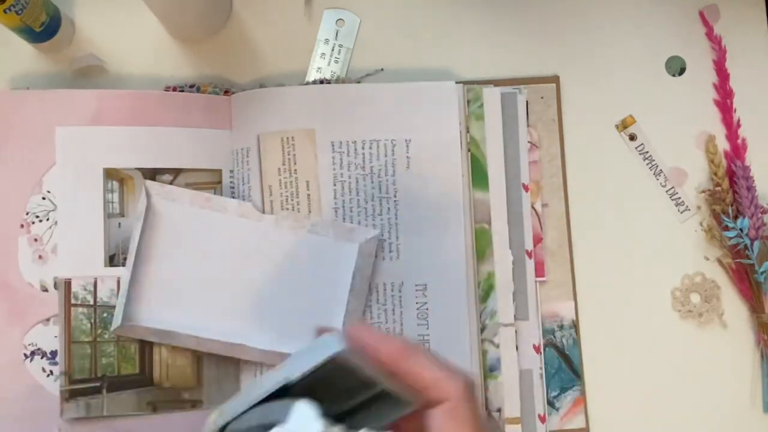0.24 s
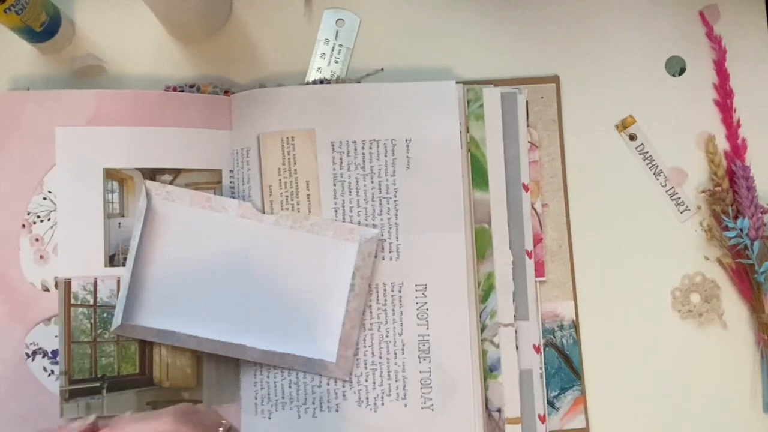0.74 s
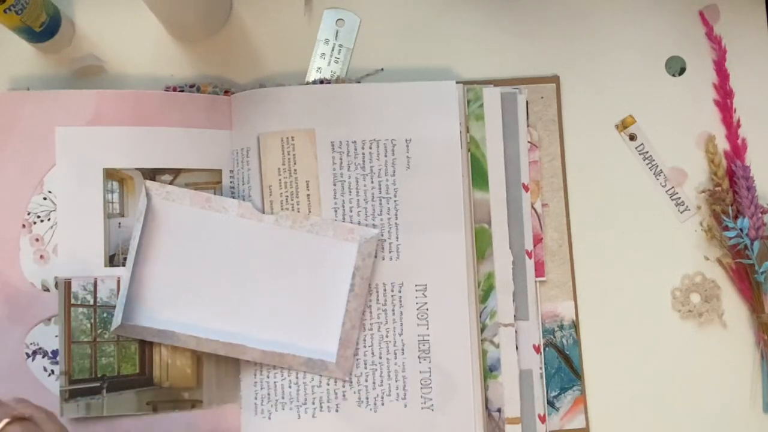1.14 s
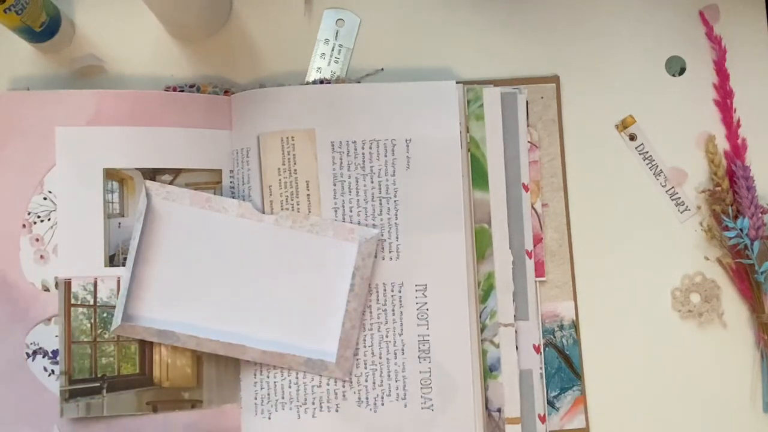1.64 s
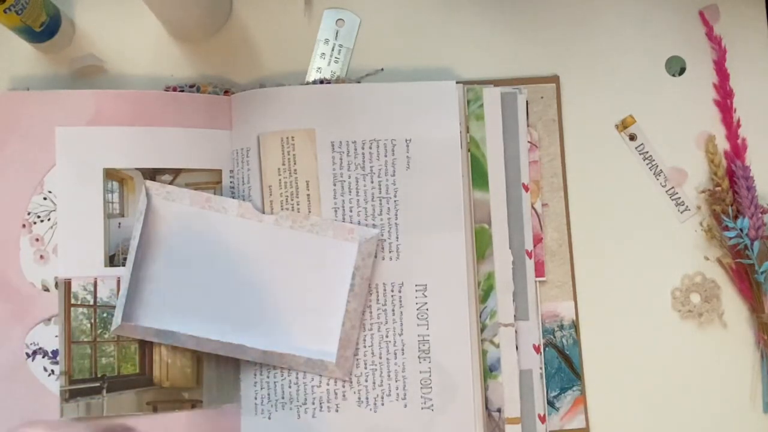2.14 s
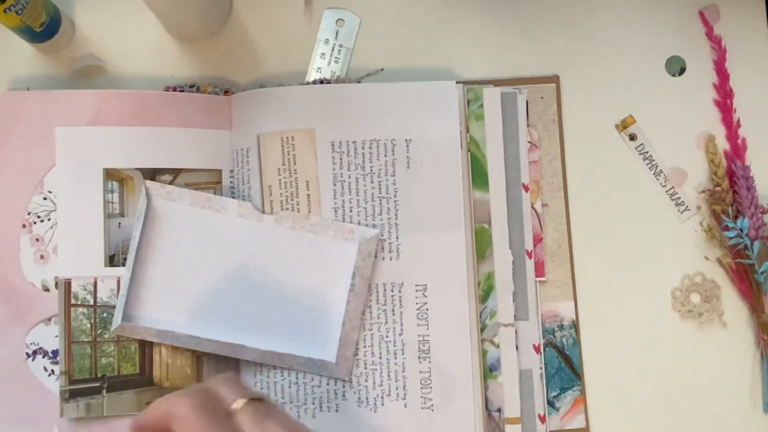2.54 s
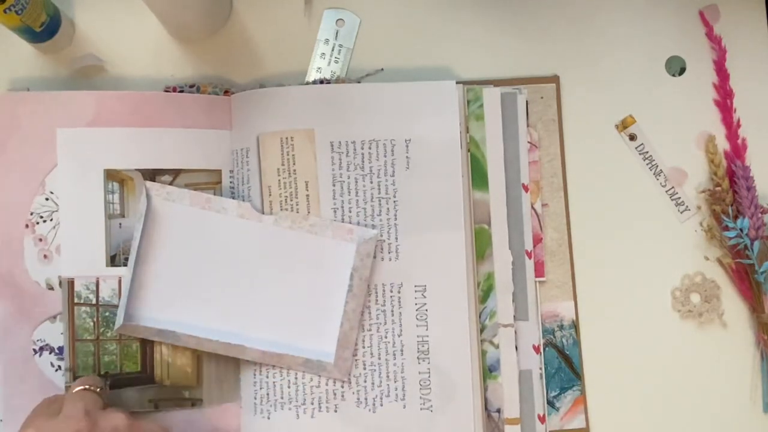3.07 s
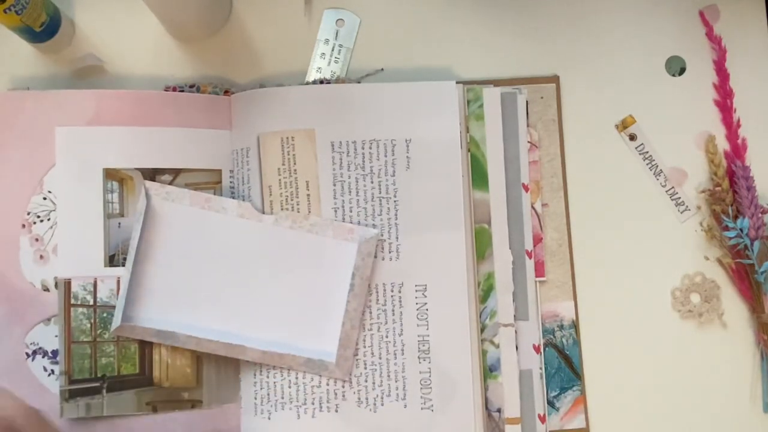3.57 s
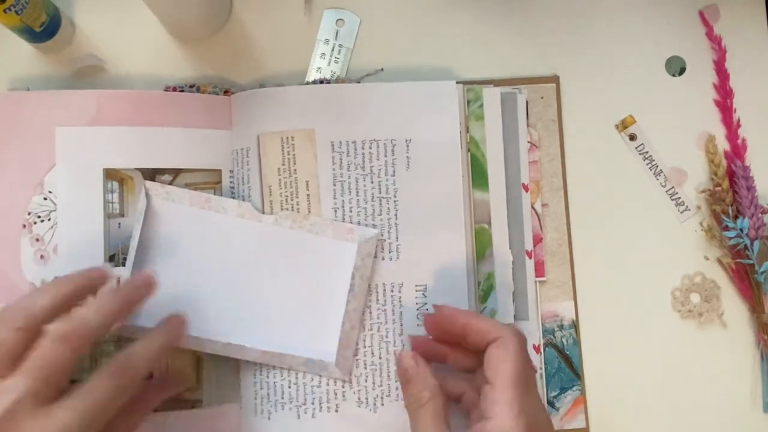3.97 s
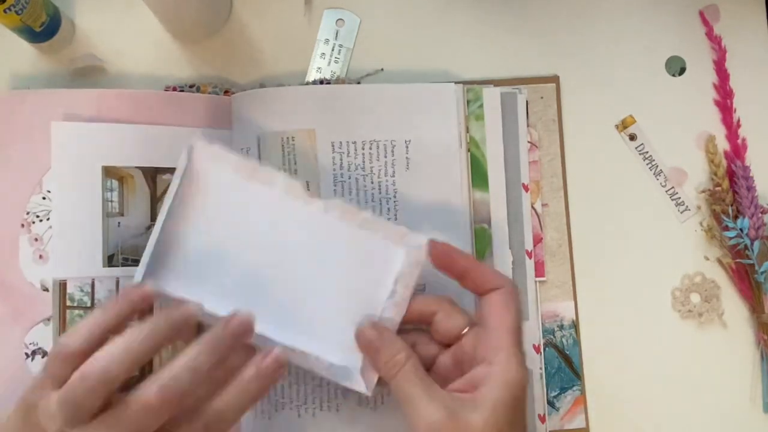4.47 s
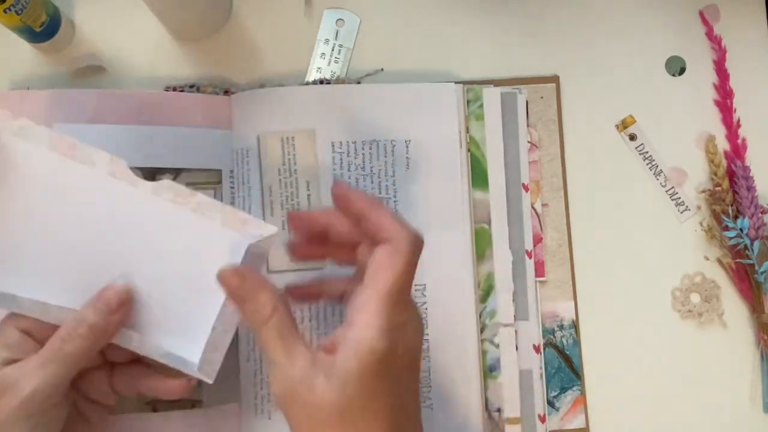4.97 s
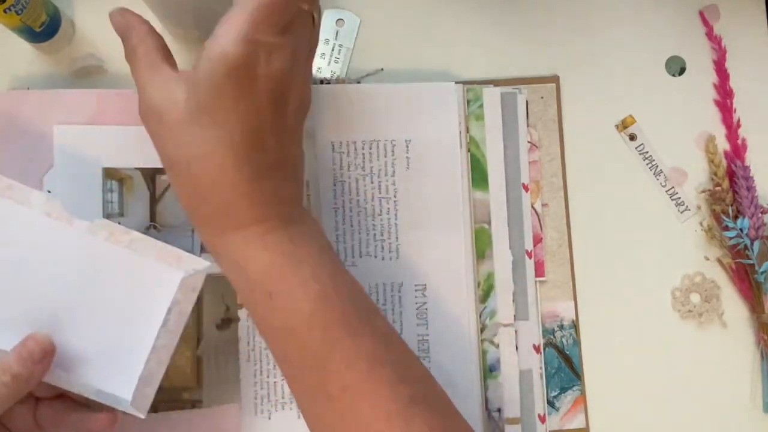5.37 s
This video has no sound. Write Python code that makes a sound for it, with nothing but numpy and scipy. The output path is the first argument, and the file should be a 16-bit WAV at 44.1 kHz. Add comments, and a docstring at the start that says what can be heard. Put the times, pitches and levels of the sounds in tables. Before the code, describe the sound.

Close stereo pickup at a craft table in a quiet small room. Brief finger rubs and paper ticks, then paper scrapes into a hand punch, a dry click as it seats, and a loud crunchy snap. A pause, the punch is put down with soft thumps, and fingers brush and flick folded paper. A low, wavering engine hum continues far off.

```python
"""Punching paper at a craft table

A hand punch close to a stereo microphone bites a notch out of folded paper: noise excites gliding slot
resonances as the paper slides in, and damped modes ring as the die seats, snaps through and is put down.
Fingers brush and lift a journal page: friction noise rubs, and short filtered bursts tick and knock.
An engine hums far off as a sum of harmonic orders over a band of rumble, amid faint room noise."""
import sys
import numpy as np
from scipy import signal
from scipy.fft import rfft, irfft, next_fast_len
from scipy.io import wavfile
from scipy.ndimage import uniform_filter1d

SR = 44100
rng = np.random.default_rng(int(sys.argv[2]) if len(sys.argv) > 2 else 0)


def master(y):
    """Save y as 16-bit WAV."""
    cut = np.clip(np.atleast_2d(y).T, -1, 1)
    pcm = np.round(cut * 32767)  # scale
    wavfile.write(sys.argv[1], SR, pcm.astype(np.int16))


N = 247401
TIME = np.arange(N) / SR

# All levels below are relative: the mix applies further gains.

# Steel die meeting the paper, then breaking through: (frequency [Hz], width [Hz], level [dB])
SEAT_MODES = [(480, 330, -14.5), (1393, 185, -2.5), (1316, 127, -8), (1780, 180, -5), (2520, 130, 1.5),
              (4020, 110, -21), (5200, 320, -9), (7400, 830, -31), (8860, 720, -24), (10100, 650, -47)]
SNAP_MODES = [(740.4, 170, -27), (1910, 210, -18), (2290, 390, -6), (3780, 290, -11.5), (4670, 210, -8),
              (5030, 320, -0.5), (5670, 230, -6.5), (6145, 220, -9), (8110, 150, -13.5), (8830, 120, -17.5),
              (10070, 190, -26), (10800, 510, -29.5), (15900, 500, -22.5)]
# Tearing fibres: (frequency [Hz], level [dB])
CRACK_COLOUR = [(300, -3), (1000, -14), (2400, 4.5), (3000, -4.5), (4000, 2), (5400, 1), (7000, 0),
                (8700, -2), (13500, -3), (15600, -24.5)]
# Cut edges scraping past the die: (frequency [Hz], level [dB])
CRUNCH_COLOUR = [(300, -7.5), (1000, -5), (1900, -7), (2500, 0), (3100, -5), (3900, 0), (4500, -3),
                 (5600, -2.5), (7000, -14.5), (9000, -4.5), (11500, -14.5), (15600, -23.5)]
# Steel of the punch ringing on, lower when squeezed shut than when let go:
# (time [s], level [dB], pitch [Hz])
STEEL_RINGS = [(1.155, -47.5, 2417), (1.766, -71, 2670)]
# Modes of that steel: (ratio to the pitch [-], level [dB], t60 [s])
STEEL_MODES = [(1, 0, .15), (1.03, -3, .12), (1.96, -4, .13)]
# Punch body ringing on the table: (frequency [Hz], level [dB], t60 [s])
BODY_MODES = [(391, 6.5, 0.067), (845, 0.5, 0.067), (1214, -13, 0.46), (1525, -13, 0.41), (1610, -12, .12),
              (1890, -1.5, 0.14), (1990, -5, 0.24), (2030, -4, 0.29), (2133, 0, 0.15), (2470, -11, 0.13),
              (4070, -4, 0.035), (4940, -3, 0.04), (5000, -12, .1)]

# Paper sliding in the slot of the punch: (start [s], hold [s], release [s], level [dB],
# first hollow resonance [Hz], last [Hz], width of each filter pass [Hz], steel resonance [Hz], its level [dB])
SLIDES = [(0.38, 0.08, 0.065, -59, 1950, 1820, 950, 2720, -7),
          (0.495, 0.12, 0.022, -68.5, 1600, 1370, 450, 2740, -12),
          (.68, 0.16, .06, -77, 1450, 1620, 450, 2520, -10),
          (.875, 0.12, 0.081, -81, 1540, 1837, 560, 2540, -14)]
# Rasp of fibres along the slot: (frequency [Hz], level [dB])
SLOT_COLOUR = [(400, -9), (900, -6.5), (1150, -8), (1500, 2.5), (2000, -8.5), (2700, -5.5), (3300, -2.5),
               (4400, 1), (5600, 6), (7000, -3.5), (8700, 0.5), (13500, -5.5), (16000, -30.5)]
SLIDE_ATTACK_S, SLIDE_SWELL_DB = 0.022, 2.5  # a slide takes hold, then gains this much over its hold
SLOT_WIDTH_HZ = 260  # width of each filter pass for the steel slot
SLIDE_RASP_DB = -5  # broad rasp beside the resonances

# Fingers and paper rubbing: (start [s], push [s], release [s], pressing drag [dB],
# centre of the drag [Hz], light sliding hiss [dB])
STROKES = [(.004, 0.0027, 0.046, -95, 880, -69), (0.087, 0.0068, 0.027, -49, 895, -51.5),
           (0.156, 0.0038, 0.029, -53.5, 1020, -64), (1.24, 0.023, 0.77, -73, 2500, -85.5),
           (1.412, 0.082, 0.018, -78, 1140, -71), (2.714, 0.006, 0.15, -64, 1305, -69.5),
           (2.86, 0.052, 0.024, -45.5, 900, -61.5), (2.946, 0.045, 0.059, -54, 824, -63),
           (3.059, 0.066, 0.018, -101, 1000, -71.5), (3.28, 0.015, 0.15, -70, 2520, -74),
           (3.375, 0.035, 0.0093, -87, 2420, -76), (3.47, 0.092, 0.2, -66.5, 1950, -77.5),
           (3.76, 0.16, 0.069, -67.5, 1407, -115), (4.009, 0.048, 0.016, -48, 887, -64),
           (4.05, 0.075, 0.04, -61, 1320, -64.5), (4.141, 0.077, 0.03, -73, 1440, -64),
           (4.225, 0.077, 0.045, -66, 1380, -60.5), (4.37, 0.085, 0.043, -61, 1160, -62),
           (4.329, 0.03, 0.038, -57, 624, -57), (4.415, 0.0093, 0.037, -49.5, 780, -78),
           (4.419, 0.014, 0.02, -52.5, 1220, -83), (4.475, 0.013, 0.0038, -58, 1130, -90),
           (4.565, 0.045, 0.72, -69, 894, -75.5), (4.729, 0.0031, 0.066, -82, 1010, -72.5),
           (4.774, 0.11, 0.015, -68, 626, -59), (4.901, 0.19, 0.78, -79.5, 706, -74),
           (5.381, 1, 0.009, -101, 864, -65.5)]
# The pressed page: (ratio to the centre of the drag [-], width of each filter pass [Hz], level [dB])
PAGE_MODES = [(1, 170, 4), (1.55, 250, 0), (2.4, 385, -4.5)]
# Pressed and lightly touched paper: (frequency [Hz], level [dB])
DRAG_COLOUR = [(100, -29), (300, 8.5), (520, -1), (850, -0.5), (1150, -3), (1500, 1), (2000, -6),
               (2500, -0.5), (3400, -11), (6000, -6), (16000, -39)]
HISS_COLOUR = [(300, -28), (1400, -13.5), (2000, -6), (2600, -4), (3400, -11), (4400, -8), (5600, -0.5),
               (7000, -5.5), (8700, -1.5), (11000, -6), (13500, -6), (15600, -13.5)]
ATTACK_SHARE, SWELL_DB = 0.14, 7  # share of the push in which a stroke takes hold; its gain until let go
PAGE_DRIFT_OCTAVES, PAGE_DB = 0.08, -4  # the page resonances drift as the finger moves
# Random bright patches in the sliding hiss: depth, width and life
HISS_PATCH_DB, HISS_PATCH_HZ, HISS_PATCH_S = 3.2, 700, .045

# Paper ticks and flicks: (time [s], level [dB], colour centre [Hz], decay [s])
TICKS = [(.0803, -49, 4260, 0.0045), (.093, -51, 2480, 0.027), (.107, -49.5, 1070, 0.0065),
         (.1596, -34, 2500, 0.00095), (.179, -36, 3360, 0.00078), (.2248, -41, 3640, 0.00094),
         (.2318, -42.5, 4030, 0.00082), (.773, -54, 1500, 0.0014), (.868, -63.5, 2550, 0.0054),
         (1.145, -49.5, 3360, .003), (1.446, -53.5, 5650, 0.0014), (1.455, -53.5, 1092, 0.003),
         (1.7652, -63.5, 4900, 0.024), (2.144, -71.5, 5170, 0.032), (2.498, -70.5, 2190, 0.012),
         (2.7155, -57.5, 5670, 0.0071), (2.784, -66.5, 7900, 0.005), (2.875, -54, 4500, 0.011),
         (3.406, -44.5, 10000, 0.0061), (3.42, -42, 8200, 0.0028), (3.425, -36.5, 11100, 0.0047),
         (3.4262, -55, 4370, 0.0022), (3.4489, -23.5, 12000, 0.0007), (3.4493, -37.5, 4210, 0.0018),
         (4.003, -54.5, 3610, 0.0019), (4.0085, -51.5, 1746, 0.0048), (4.025, -53, 1470, 0.014),
         (4.16, -57.5, 2320, 0.0023), (4.184, -51, 2600, 0.0016), (4.249, -63, 2430, 0.0011),
         (4.268, -57, 2800, 0.0022), (4.297, -56, 3240, .003), (4.333, -51.5, 5200, 0.0022),
         (4.349, -51, 3400, 0.0025), (4.361, -49, 3540, 0.0024), (4.616, -51.5, 2030, 0.012),
         (4.621, -44, 5000, 0.0056)]
# Soft knocks on the table and journal: (time [s], level [dB], colour centre [Hz], decay [s])
KNOCKS = [(2.149, -53, 480, 0.021), (2.260, -51.5, 794, 0.024), (2.291, -47, 850, 0.024),
          (2.308, -52, 1000, 0.03), (2.367, -52.5, 2490, 0.0042), (2.369, -51, 464, 0.019),
          (2.381, -58.5, 1830, 0.033), (2.903, -40.5, 1116, 0.0031), (3.012, -41.5, 453, 0.0042),
          (4.351, -51, 758, 0.0084), (4.419, -47.5, 1880, 0.013), (4.634, -44.5, 1190, 0.0075),
          (4.643, -45, 423, 0.0063), (4.663, -53, 330, 0.0084), (4.735, -48, 820, 0.0115),
          (4.868, -43, 370, 0.0055), (4.878, -47.5, 684, 0.011), (5.0095, -54.5, 990, 0.011)]
# Colours of both, before the skirts around each centre: (frequency [Hz], level [dB])
TICK_COLOUR = [(200, -4.5), (500, 1), (900, 8), (1900, 3.5), (3100, -2.5), (3800, -8.5), (5400, 1),
               (9000, 0), (16000, -3.5)]
KNOCK_COLOUR = [(30, -51.5), (70, 35), (140, 13), (220, 10.5), (300, 5.5), (900, -9), (2400, -15.5),
                (4000, -22), (5200, -16), (8000, -28), (16000, -40)]
# After each contact the paper settles briefly; stiff edges do so a little less
SETTLE_DB, SETTLE_S, SETTLE_DB_PER_KHZ = -18, 0.013, -0.18
# Punch and hand landing on the table: (time [s], level [dB])
THUMPS = [(2.266, -61), (2.296, -35), (2.31, -40), (2.327, -37.5)]
# Table top: (frequency [Hz], level [dB], t60 [s])
TABLE_MODES = [(122, -4, 0.12), (152.5, 7.5, 0.1), (218.6, -3.5, 0.17), (304, -14, 0.036), (443, -18, 0.12)]

# First echoes off the table and nearby things: (delay [s], left gain [-], right gain [-])
ECHOES = [(.0009, 0.083, -0.068), (.0021, 0.022, 0.007), (.0036, -0.0071, -0.066), (.0054, 0.018, 0.081),
          (0.014, .07, -.03), (0.019, .04, 0.11)]
# Decay of the room: (frequency [Hz], t60 [s])
ROOM_T60 = [(150, 0.7), (450, 0.26), (800, 0.018), (2000, 0.26), (5500, 0.28), (12000, 0.05)]
# Colour of its tail: (frequency [Hz], level [dB])
ROOM_COLOUR = [(100, -10), (500, 2.5), (800, 11.5), (2500, -5.5), (3900, 2), (5000, -2.5), (6000, -2),
               (9000, -7.5), (16000, 11.5)]
ROOM_APART = .6  # size of each side's own tail against the shared one

# Firing tone of the far engine: (time [s], frequency [Hz])
FIRING_PITCH = [(0.0, 101.5), (0.78, 103.5), (2.22, 101.5), (2.33, 108.5), (2.45, 96), (2.81, 93.5),
                (3.36, 98), (3.53, 105.5), (4.66, 106.5), (4.76, 101), (5.45, 94.5), (5.61, 105)]
# The firing tone and the octave above it: (time [s], level [dB])
FIRING = [(0.0, -72), (0.06, -65), (0.15, -56), (0.8, -52), (1.95, -53.5), (2.06, -65), (2.19, -49.5),
          (2.37, -47.5), (2.64, -59), (2.65, -80.5), (2.72, -49.5), (3.28, -50), (3.37, -67), (3.48, -57.5),
          (3.92, -49), (4.11, -60), (4.44, -50), (4.62, -63), (4.8, -49.5), (4.94, -53.5), (5.39, -43),
          (5.61, -45.5)]
OCTAVE = [(0, -88.5), (1.0, -80), (3.2, -77.5), (3.6, -68), (4.3, -74), (4.9, -82), (5.61, -80)]
# Weaker orders: (cycles per engine turn [-], level [dB])
ORDERS = [(2, -73), (3, -67.5), (5, -65), (6, -79), (7, -83.5), (9, -87), (10, -81.5), (11, -87), (12, -86)]
FIRINGS_PER_TURN = 4
ORDERS_FOLLOW, USUAL_FIRING_DB = 0.047, -49  # the orders share a small part of each firing-tone swell
DRONE_DB, DRONE_RISE_DB, DRONE_BUILD_S = 1.5, 13.5, 0.82  # orders and rumble build up and level off
# Engine rumble and still room: (frequency [Hz], level [dB])
RUMBLE_COLOUR = [(20, -7), (35, -2.5), (55, 14), (100, 16.5), (160, 7), (250, -4.5), (400, -6), (1000, -32),
                 (4000, -67.5)]
AIR_COLOUR = [(20, -12.5), (200, -8.5), (350, -4), (600, 1), (1200, -12), (2400, -15), (3500, -15.5),
              (5500, -19.5), (8000, -33), (15000, -26)]
# Rumble and room noise waver band by band: depth, width and life of the patches
NOISE_PATCH_DB, NOISE_PATCH_HZ, NOISE_PATCH_S = 2.5, 170, .13

# Two microphone ports: (frequency [Hz], phase by which left leads [rad])
PORT_PHASE = [(20, 0), (250, 0), (520, -.4), (950, .2), (1300, -.3), (2400, .9), (3000, 1.2), (3500, .5),
              (4100, 1.0), (5200, .1), (6500, 2.5), (8100, 3.5), (9730, 6.1), (11500, 6.6), (12700, 9.2),
              (14400, 9.5), (15400, 11.9)]
EDGE_HZ = 16300  # upper band limit


def punch():
    """Impulsive modal excitation: the die snaps through, crunches and rings; later the punch clinks down."""
    out = np.zeros(N)
    snap = die_blow(SNAP_MODES, db=-15.0, rise=0.0014, crack_db=-28.0, crack_decay=0.0026, dull_db=-5.5)
    add(out, 1.1538, snap)
    add(out, 1.157, amp(-45.5) * colour(burst(decay=0.037), CRUNCH_COLOUR))
    for start, db, pitch_hz in STEEL_RINGS:
        modes = [(ratio * pitch_hz, mode_db, t60) for ratio, mode_db, t60 in STEEL_MODES]
        add(out, start, amp(db) * ringing(modes, rise=0.001))
    add(out, 2.368, amp(-57) * ringing(BODY_MODES, rise=0.00062))
    return out


def seating():
    """Damped modal impact: the die meets the paper with a dry, hollow click."""
    out = np.zeros(N)
    click = die_blow(SEAT_MODES, db=-24.0, rise=0.0021, crack_db=-33.5, crack_decay=0.0022, dull_db=38.0)
    add(out, .5424, click)
    return out


def die_blow(modes, db, rise, crack_db, crack_decay, dull_db):
    """Modal superposition: a force building over a moment rings the hand-damped punch as fibres crack."""
    t = np.arange(SR // 5) / SR
    ring = sum(amp(mode_db) * np.exp(-np.pi * width * t) * np.sin(2 * np.pi * hz * t)
               for hz, width, mode_db in modes)
    ring *= np.sin(np.pi / 2 * np.minimum(t / rise, 1)) ** 2
    treble = read([(9000, 0), (16000, 1)], np.transpose(CRACK_COLOUR)[0])
    # Crushed fibres sound duller than torn ones
    spectrum = np.array(CRACK_COLOUR) - np.outer(treble, [0, dull_db])
    crack = colour(burst(crack_decay), spectrum)
    return amp(db) * ring / abs(ring).max() + amp(crack_db) * crack


def slot():
    """Noise-driven resonance: sliding paper excites the slot, whose hollow pitch glides as it goes."""
    slips = friction(1500, 0.4, uneven_db=1.3)
    scrape = evened(colour(slips, SLOT_COLOUR))
    out = np.zeros(N)
    for start, hold, release, db, first_hz, last_hz, width, steel_hz, steel_db in SLIDES:
        motion = envelope(SLIDE_ATTACK_S, hold, release, SLIDE_SWELL_DB)
        first, length = round(start * SR), len(motion)
        drive, rasp = slips[first:][:length], scrape[first:][:length]
        glide_hz = np.interp(TIME[:length], [0, hold], [first_hz, last_hz])
        gap = hollow(drive, glide_hz, width)
        steel = hollow(drive, np.full(length, steel_hz), SLOT_WIDTH_HZ)
        voice = gap + amp(steel_db) * steel + amp(SLIDE_RASP_DB) * rasp
        add(out, start, amp(db) * motion * evened(voice))
    return out


def rustle():
    """Stick-slip friction: pressed paper rings the page in small slips; light contact hisses and crackles."""
    drag, sliding = np.zeros((2, N))
    fibres = friction(1400, 0.35, uneven_db=0.8)
    drift = 2 ** (PAGE_DRIFT_OCTAVES * wander(17))
    for start, push, release, drag_db, drag_hz, hiss_db in STROKES:
        motion = envelope(ATTACK_SHARE * push, push, release, SWELL_DB)
        slips, shift = (np.roll(v, -round(start * SR))[:len(motion)] for v in (fibres, drift))
        page = sum(amp(db) * hollow(slips, ratio * drag_hz * shift, width) for ratio, width, db in PAGE_MODES)
        broad = evened(colour(slips, DRAG_COLOUR, drag_hz, steep_db=8.5))
        voice = broad + amp(PAGE_DB) * evened(page)
        add(drag, start, amp(drag_db) * motion * evened(voice))
        add(sliding, start, amp(hiss_db) * motion)
    hiss = friction(670, 0.15, uneven_db=1.4)
    crackle = friction(90, 0.9, uneven_db=1.5)
    light = patchy(colour(hiss + 0.16 * crackle, HISS_COLOUR), HISS_PATCH_DB, HISS_PATCH_HZ, HISS_PATCH_S)
    return amp(-7.0) * drag + amp(2.0) * sliding * light


def friction(grains_per_s, grain_share, uneven_db):
    """Random-impulse friction: fine noise and separate fibre catches, swelling with stick and slip."""
    catches = rng.standard_normal(N) * (rng.random(N) < grains_per_s / SR)
    share = np.clip(grain_share, 0, 1)
    drive = np.sqrt(1 - share) * rng.standard_normal(N) + np.sqrt(share) * evened(catches)
    return evened(drive * amp(uneven_db * wander(40)))


def taps(rows, spectrum, steep_db, stiffening, rise):
    """Contact stiffness: stiff edges sound high, thin and dry, soft broad ones low and wide."""
    out = np.zeros(N)
    for start, db, centre_hz, decay in rows:
        khz = centre_hz / 1000
        settling = amp(SETTLE_DB + SETTLE_DB_PER_KHZ * khz) * burst(SETTLE_S)
        slips = burst(decay, rise) + settling
        steepness = steep_db + stiffening * (khz / 10) ** 2
        add(out, start, amp(db) * colour(slips, spectrum, centre_hz, steepness))
    return out


def table():
    """Plate modes: each landing thumps the same low modes of the table top."""
    out = np.zeros(N)
    t = np.arange(SR // 4) / SR
    thump = sum(amp(db - 60 * t / t60) * np.sin(2 * np.pi * hz * t) for hz, db, t60 in TABLE_MODES)
    for start, db in THUMPS:
        add(out, start, amp(db) * thump / abs(thump).max())
    return out


def echoes(x):
    """Specular reflection: direct sound with delayed first echoes that differ from side to side."""
    out = np.array([x, x])
    for delay, *gains in ECHOES:
        for side, gain in zip(out, gains):
            add(side, delay, gain * x)
    return out


def room(x, apart):
    """Diffuse reverberation: a partly shared noise tail in which each band decays at its own rate."""
    shared, left, right = rng.standard_normal((3, SR // 2))
    hz, t, z = signal.stft(shared + apart * np.array([left, right]), SR, nperseg=256)
    decay_db = read(ROOM_COLOUR, hz)[:, None] - 60 * t / read(ROOM_T60, hz)[:, None]
    tail = signal.istft(z * amp(decay_db), SR, nperseg=256)[1]
    tail *= np.minimum(np.arange(tail.shape[1]) / SR / 0.011, 1)  # builds up over 11 ms
    return signal.fftconvolve(x[None], tail / np.linalg.norm(tail[0]), axes=1)[:, :N]


def engine():
    """Harmonic orders: through the walls come low orders and rumble; the firing tone swells and fades."""
    cycles = np.cumsum(np.interp(TIME, *np.transpose(FIRING_PITCH))) / SR
    turns = cycles / FIRINGS_PER_TURN
    waver_db = 1.2 * wander(9)
    firing = level(FIRING) * amp(waver_db) * np.cos(2 * np.pi * cycles)
    firing += level(OCTAVE) * np.cos(2 * np.pi * 2 * cycles)
    orders = sum(amp(db + 3.1 * wander(2.1)) * np.cos(2 * np.pi * (round(order) * turns + rng.random()))
                 for order, db in ORDERS)
    orders *= (level(FIRING) / amp(USUAL_FIRING_DB)) ** ORDERS_FOLLOW
    rumble = amp(-65.5) * stereo_noise(RUMBLE_COLOUR, apart=0.7)
    drone = amp(DRONE_DB - DRONE_RISE_DB * np.exp(-TIME / DRONE_BUILD_S))
    sides = np.sqrt(2) * firing + drone * (np.sqrt(2) * orders + rumble)
    return sides * amp([[.6], [-.6]])  # left 1.2 dB above right


def air():
    """Diffuse noise field: faint room noise, partly shared by both sides."""
    return amp(-84.5) * stereo_noise(AIR_COLOUR, apart=2.0)


def stereo_noise(spectrum, apart):
    """Partial coherence: one shared noise plus a separate noise on each side."""
    shared, left, right = (patchy(colour(rng.standard_normal(N), spectrum),
                                  NOISE_PATCH_DB, NOISE_PATCH_HZ, NOISE_PATCH_S) for _ in range(3))
    return shared + apart * np.array([left, right])


def ringing(modes, rise):
    """Modal decay: a struck body's modes build up in a moment and die at their own speeds."""
    t = np.arange(SR // 2) / SR
    ring = sum(amp(db - 60 * t / t60) * np.sin(2 * np.pi * (hz * t + rng.random())) for hz, db, t60 in modes)
    return np.minimum(t / rise, 1) * ring


def burst(decay, rise=0.00087):
    """Exponential relaxation: a short shower of fibre slips, dying away."""
    t = np.arange(SR // 5) / SR
    return rng.standard_normal(len(t)) * np.exp(-t / decay) * (1 - np.exp(-t / rise))


def envelope(attack, hold, release, swell_db=0):
    """Contact force: it takes hold, swells while pushed, then decays exponentially."""
    t = np.arange(0, hold + np.log(1000) * release, 1 / SR)
    pushed = amp(swell_db * (np.minimum(t / hold, 1) - 1))
    return np.minimum(t / attack, 1) * pushed * np.exp(-np.maximum(t - hold, 0) / release)


def resonate(x, hz, width):
    """Heterodyne resonance: shift to zero frequency, smooth, and shift back to the moving centre hz."""
    turn = np.exp(2j * np.pi * np.cumsum(hz) / SR)
    r = np.exp(-np.pi * width / SR)
    return 2 * (turn * signal.lfilter([1 - r], [1, -r], x / turn)).real


def hollow(x, hz, width):
    """Cascaded resonance: two passes at the moving pitch hz give steep skirts; rms 1."""
    return evened(resonate(resonate(x, hz, width), hz, width))


def patchy(x, depth_db, width_hz, life_s):
    """Time-varying spectrum: favours ever-changing random bands of a noise."""
    hz, t, z = signal.stft(x, SR, nperseg=512)
    patches = uniform_filter1d(rng.standard_normal(z.shape[::-1]), round(life_s / t[1]), axis=0)
    patches = evened(uniform_filter1d(patches, round(width_hz / hz[1]), axis=1))
    return evened(signal.istft(z * amp(depth_db * patches.T), SR, nperseg=512)[1][:N])


def colour(x, spectrum, centre_hz=1000, steep_db=0):
    """Minimum-phase filtering: unit-energy taps with a spectrum and skirts falling from a centre."""
    hz = np.fft.rfftfreq(4096, 1 / SR)
    octaves = np.log2((hz + 1) / centre_hz)
    db = read(spectrum, hz) - steep_db * np.hypot(1, octaves)
    # Folding the cepstrum onto positive time makes the filter causal
    cepstrum = irfft(np.log(amp(db)))
    cepstrum[1:len(hz) - 1] *= 2
    cepstrum[len(hz):] = 0
    impulse = irfft(np.exp(rfft(cepstrum)))
    return signal.oaconvolve(x, impulse / np.linalg.norm(impulse))[:len(x)]


def wander(per_s):
    """Low-passed random process: smooth motion scaled to rms 1."""
    step = 64
    coarse = TIME[::step]
    hz = np.fft.rfftfreq(len(coarse), step / SR)
    slow = irfft(rfft(rng.standard_normal(len(coarse))) / (1 + (hz / per_s) ** 4), len(coarse))
    return np.interp(TIME, coarse, evened(slow))


def amp(db):
    """Logarithmic level: decibels to gain."""
    return 10 ** (np.asarray(db) / 20)


def evened(x):
    """Root-mean-square normalisation: scales to rms 1."""
    return x / np.sqrt(np.mean(x ** 2) + 1e-20)


def read(points, hz):
    """Logarithmic frequency: interpolates a spectrum on a log axis."""
    f, value = np.transpose(points)
    return np.interp(np.log(hz + 1), np.log(f + 1), value)


def level(rows):
    """Level contour: gain over time from a dB curve."""
    return amp(np.interp(TIME, *np.transpose(rows)))


def add(mix, start, sound):
    """Linear superposition: mixes a sound in at a start time in seconds."""
    part = mix[round(start * SR):][:len(sound)]
    part += sound[:len(part)]


def scene():
    """Superposition of direct and reverberant sound: punch and paper close by, the engine far off."""
    ticks = taps(TICKS, TICK_COLOUR, steep_db=7.5, stiffening=17, rise=.00025)
    knocks = taps(KNOCKS, KNOCK_COLOUR, steep_db=8.5, stiffening=0, rise=0.00056)
    paper = rustle() + slot() + ticks + knocks + table()
    seat, snap = seating(), punch()
    # The hand and the table edge screen the punch from the room
    shielded = amp(-17) * (seat + snap)
    tail = room(amp(-11.5) * paper + shielded, ROOM_APART)
    # Left and right balance of each near source, in dB
    near = echoes(paper) * amp([[-.3], [.3]])
    near += echoes(seat) * amp([[-1.2], [1.2]])
    near += echoes(snap) * amp([[-.6], [.6]])
    return near + tail + engine() + air()


def record(dry):
    """Phase difference between two ports: they drift apart towards the treble; then the band limit."""
    margin = SR // 10
    padded = np.pad(dry, [(0, 0), (margin, margin)], mode="reflect", reflect_type="odd")
    size = next_fast_len(padded.shape[1])
    lead = read(PORT_PHASE, np.fft.rfftfreq(size, 1 / SR))
    turn = np.exp(.5j * np.array([[1], [-1]]) * lead)  # half the lead on each side
    ported = irfft(rfft(padded, size) * turn, size)
    low_pass = signal.firwin(401, EDGE_HZ, window=("kaiser", 9), fs=SR)
    return signal.oaconvolve(ported, low_pass[None], "same")[:, margin:margin + N]


dry = scene()
out = record(dry)
master(out)
```